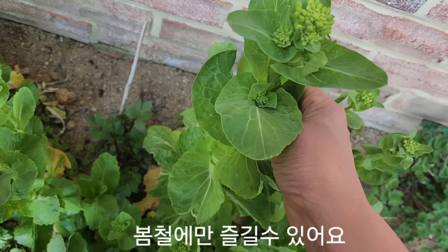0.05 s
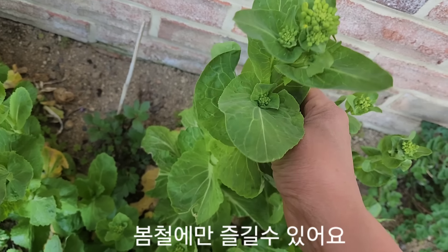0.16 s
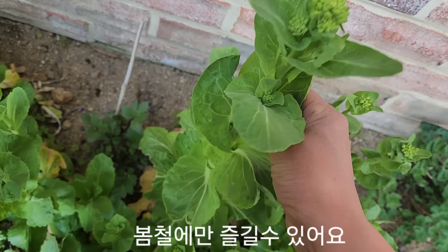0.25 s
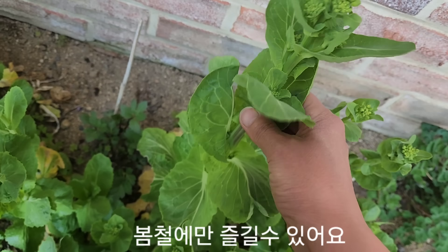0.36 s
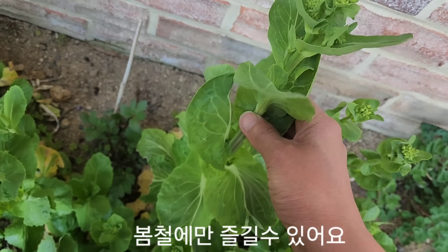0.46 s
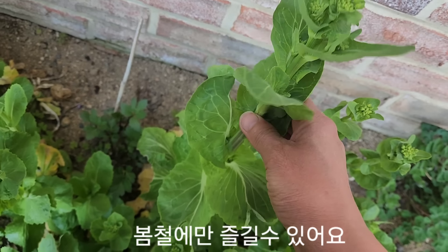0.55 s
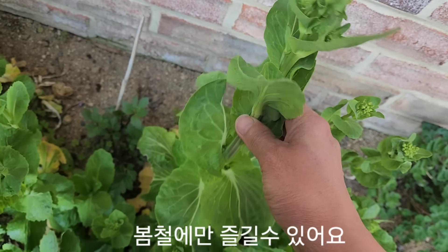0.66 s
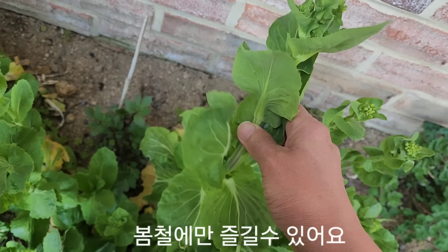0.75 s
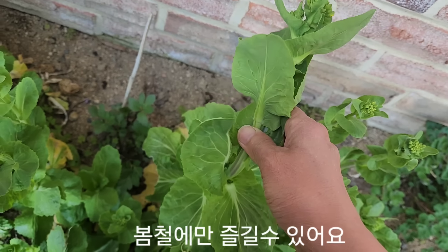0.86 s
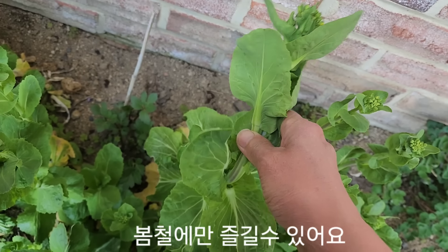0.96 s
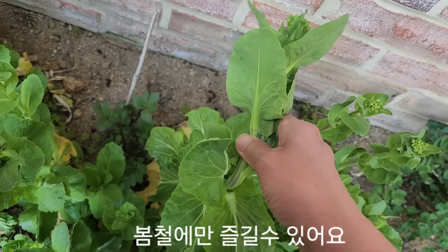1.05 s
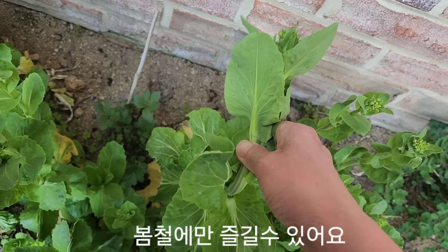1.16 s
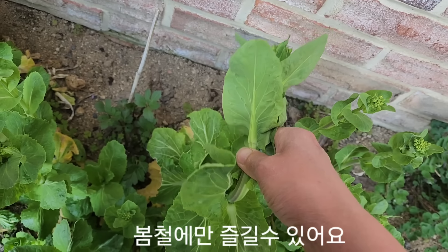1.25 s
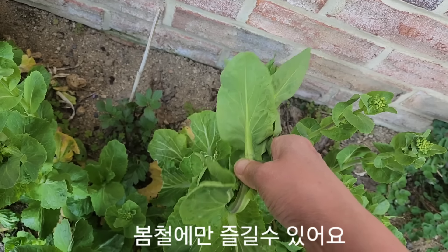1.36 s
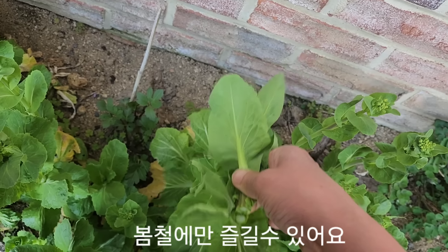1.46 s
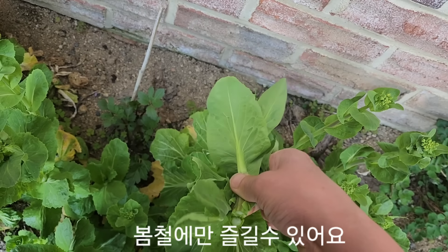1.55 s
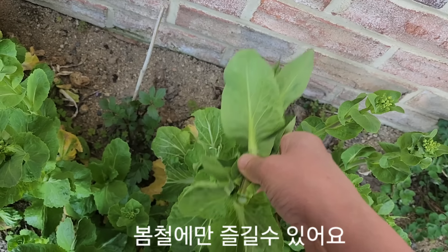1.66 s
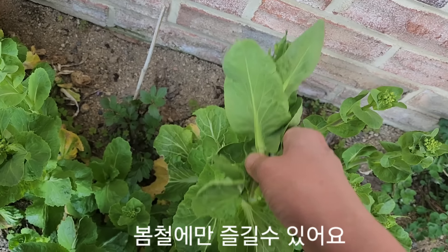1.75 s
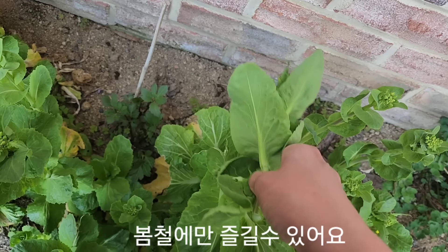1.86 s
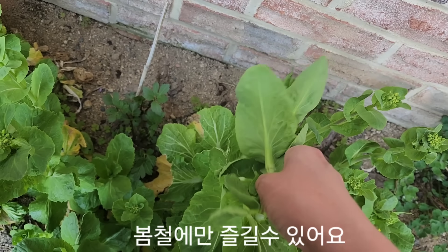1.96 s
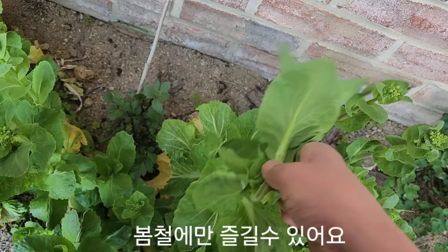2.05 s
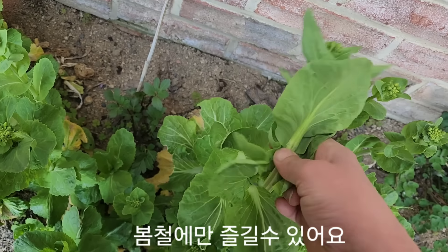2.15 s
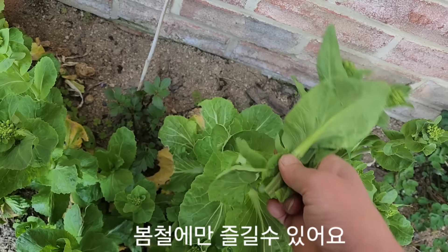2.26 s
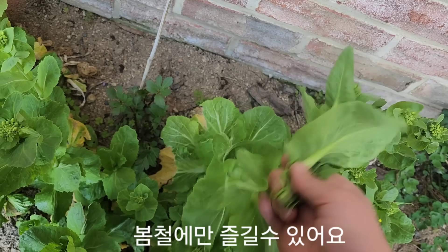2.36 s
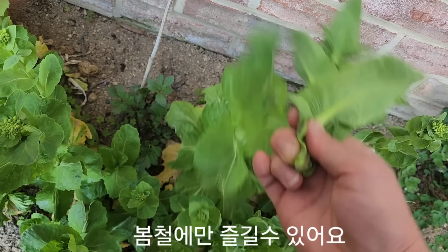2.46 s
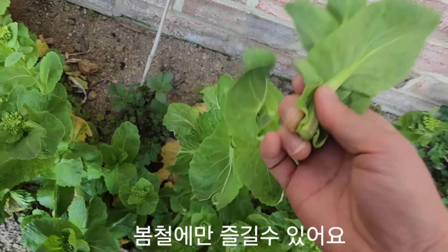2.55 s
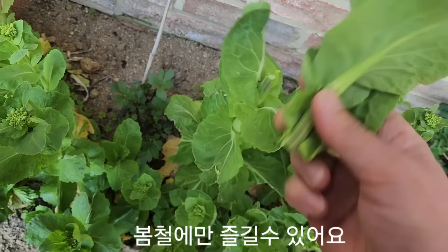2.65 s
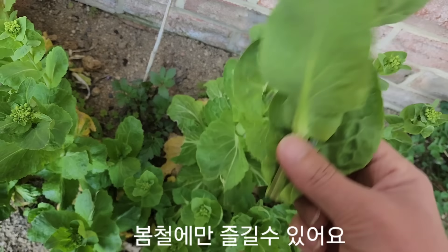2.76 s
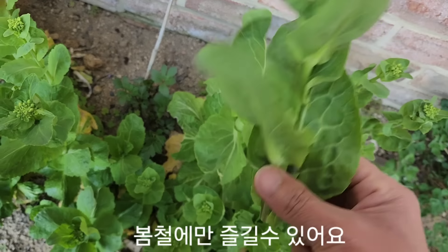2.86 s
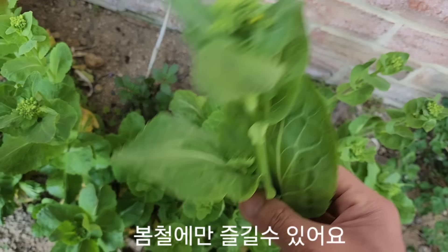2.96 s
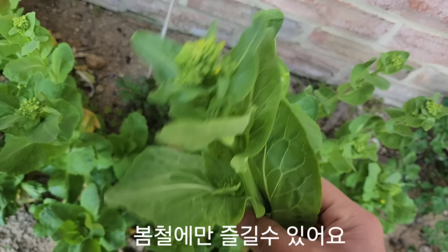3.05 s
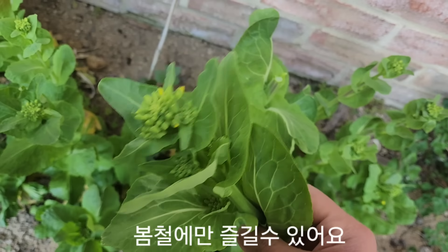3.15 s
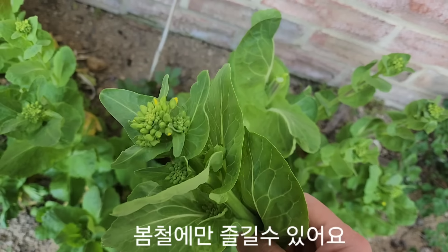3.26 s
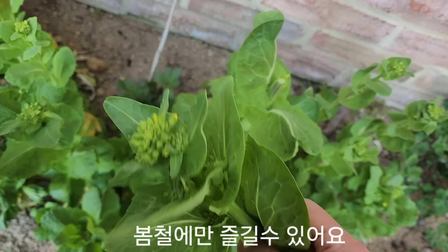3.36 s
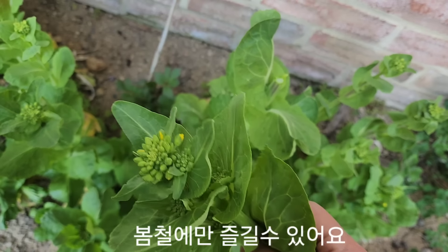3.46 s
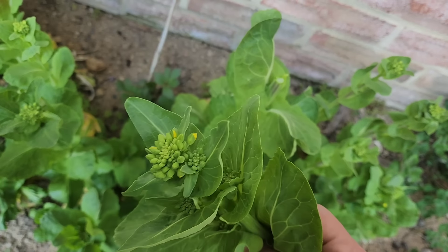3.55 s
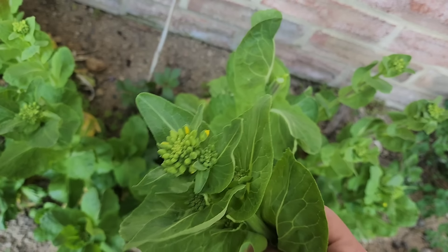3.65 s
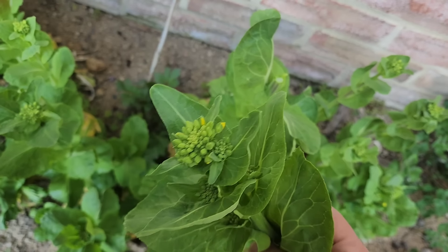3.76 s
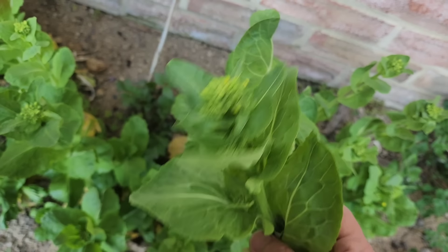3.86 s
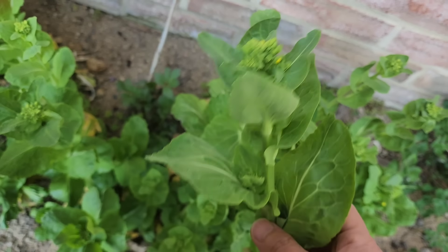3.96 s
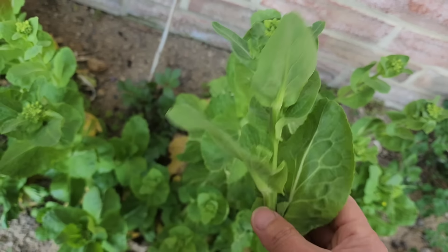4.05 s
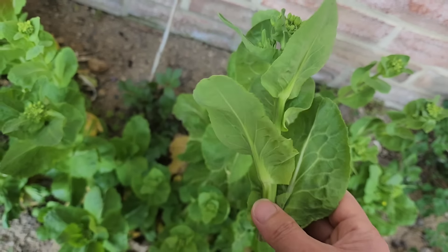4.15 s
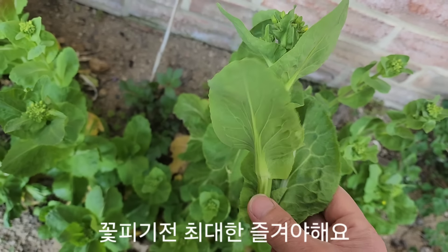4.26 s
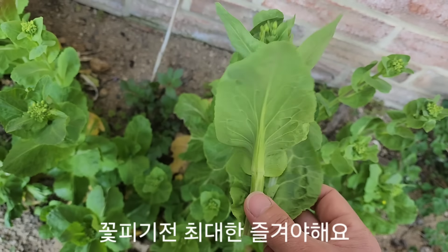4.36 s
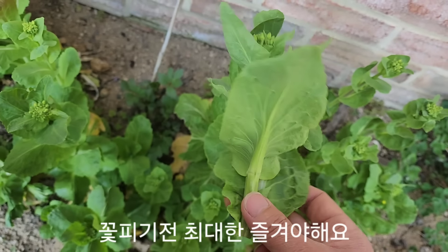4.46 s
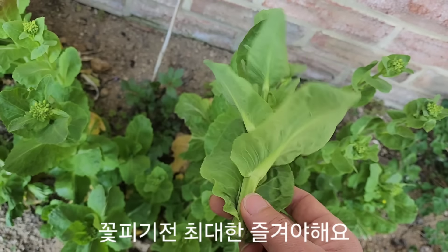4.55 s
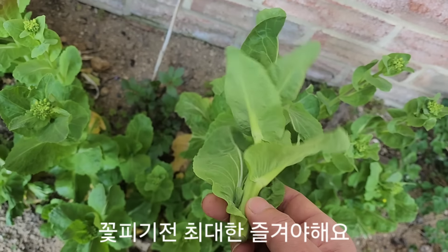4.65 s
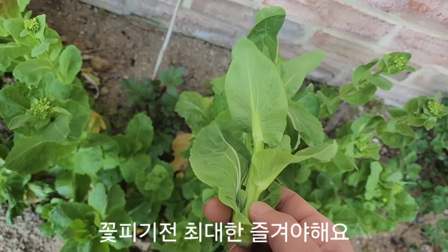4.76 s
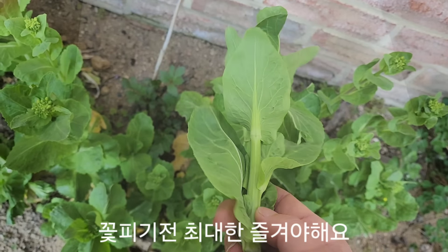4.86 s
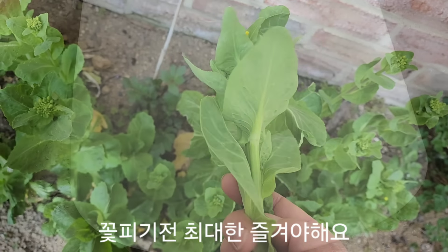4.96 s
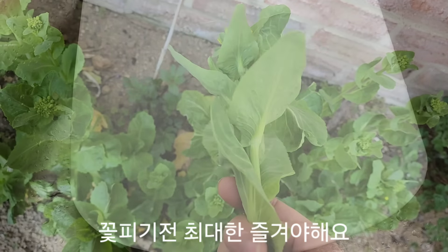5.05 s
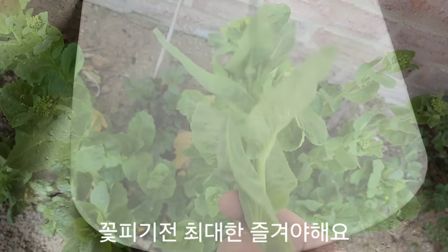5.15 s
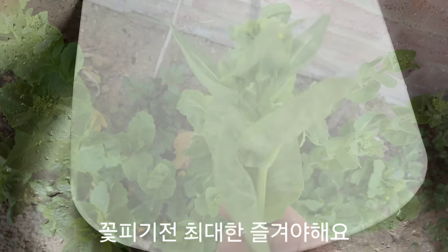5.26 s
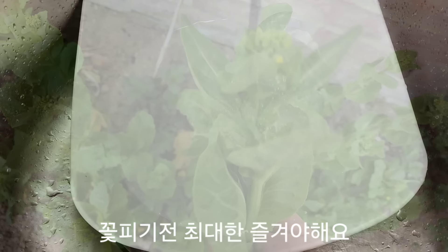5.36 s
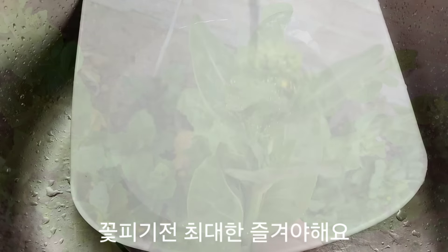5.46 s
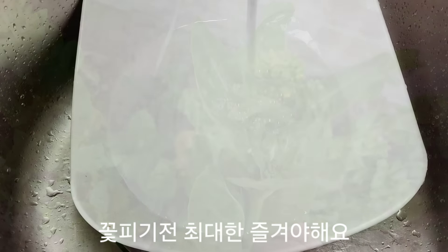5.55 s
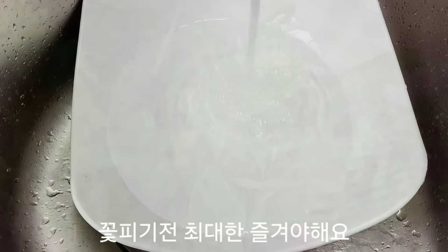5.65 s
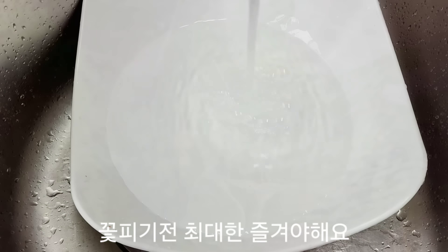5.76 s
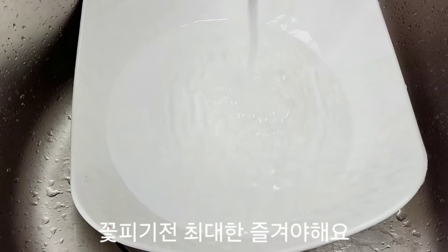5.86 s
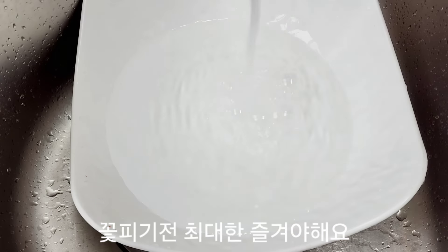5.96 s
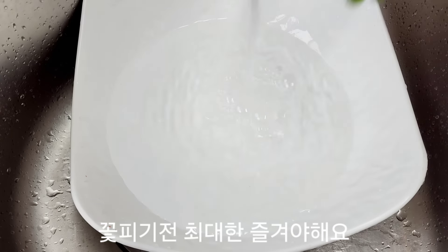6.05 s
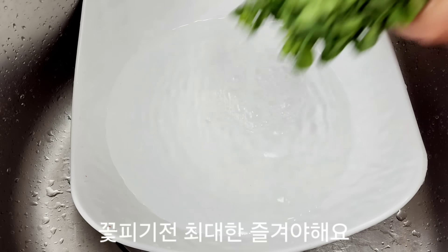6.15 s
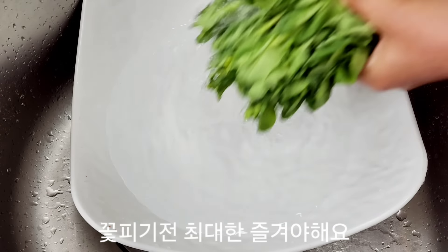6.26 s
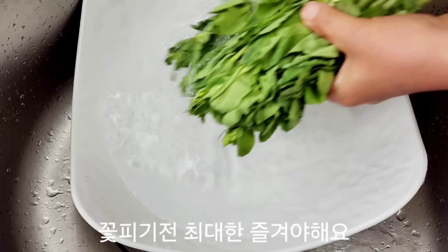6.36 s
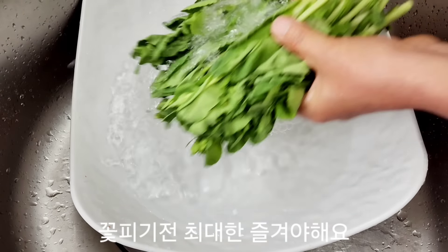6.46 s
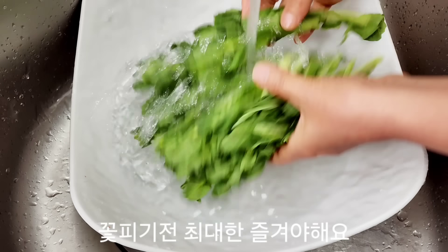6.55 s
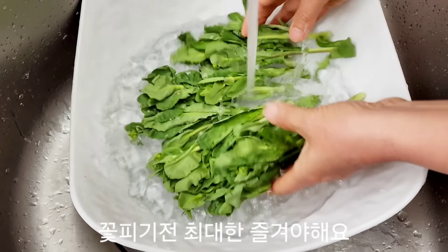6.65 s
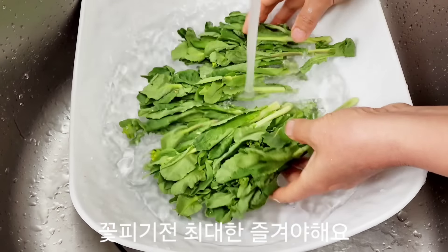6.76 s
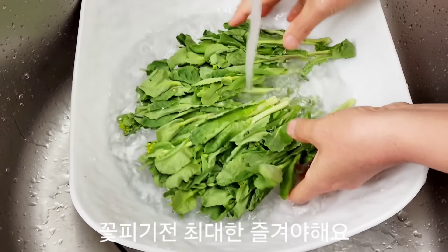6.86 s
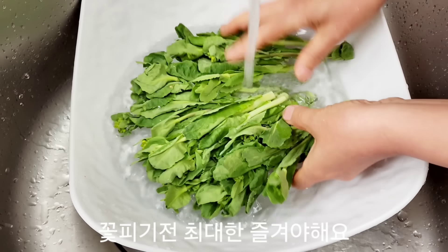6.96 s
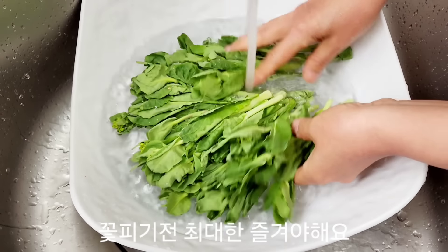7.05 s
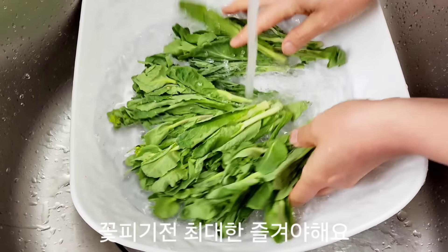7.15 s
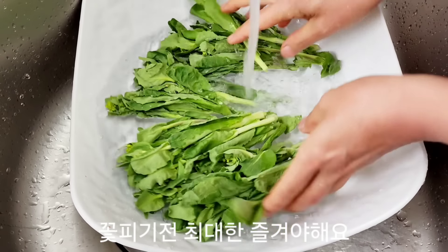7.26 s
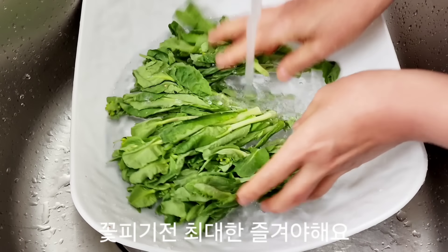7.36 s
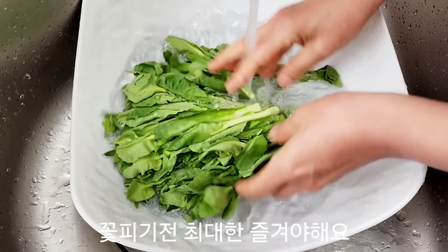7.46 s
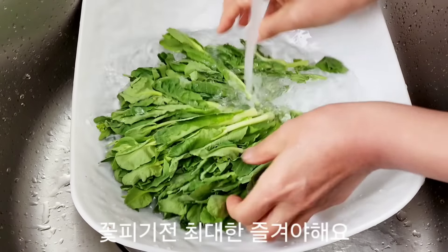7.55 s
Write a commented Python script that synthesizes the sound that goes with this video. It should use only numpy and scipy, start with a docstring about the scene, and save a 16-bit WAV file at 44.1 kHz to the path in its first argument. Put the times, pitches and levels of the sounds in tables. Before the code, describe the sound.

Close outdoor recording: a hand brushes through leafy plants with soft rustles and small ticks, over a faint low engine hum. Two crisp stalk snaps crack out, followed by small squeaky creaks. The garden fades into a kitchen sink where a tap drums into a shallow plastic basin, then a bunch of greens drops in and is swished, turning the water to splash and patter.

```python
"""A hand rustles through leafy greens in a garden and snaps off two crisp shoots, a far engine droning behind.
Leaves are coloured noise and tiny slips; stalks are cracks of noise over damped modes; the engine is a few sines.
The garden fades into a kitchen: a tap drums into a shallow plastic basin, then greens are swished under the stream.
The water is impulses through resonances, clouds of bubbles and spray noise; bumps on the basin are damped modes."""
import sys
import numpy as np
from scipy import signal
from scipy.fft import rfft, irfft, next_fast_len
from scipy.io import wavfile
from scipy.ndimage import uniform_filter1d, map_coordinates

SR = 44100
rng = np.random.default_rng(int(sys.argv[2]) if len(sys.argv) > 2 else 0)


def to_wav(sig):
    """Store sig (one row per channel, or 1-D mono) as 16-bit WAV at the path in sys.argv[1].

    Samples outside -1..1 are clipped; the rate is SR.
    """
    pcm = np.clip(np.atleast_2d(sig), -1, 1) * 32767
    pcm = np.round(pcm).astype(np.int16)
    wavfile.write(sys.argv[1], SR, pcm.T)  # frames by channels


N = 335601

# How alike left and right are in the open garden: f/Hz, likeness (0-1)
OUTDOORS = [(100, 0.94), (1000, 0.23), (3000, 0.2), (10000, 0.12)]
# How alike left and right are in the kitchen: f/Hz, likeness (0-1)
INDOORS = [(100, .98), (300, 0.98), (800, 0.36), (2000, 0.15), (5000, 0.0053), (12000, 0)]


def amp(db):
    """Decibels to gain."""
    return 10 ** (np.asarray(db) / 20)


def unit(x):
    """Scale to rms 1."""
    return x / np.sqrt(np.mean(x ** 2) + 1e-20)


def along(points, hz):
    """Read (Hz, value) points at any frequency, on a log axis."""
    f, v = np.transpose(points)
    return np.interp(np.log(hz + 1), np.log(f + 1), v)


def curves(rows):
    """One value per sample for each column after the time; -120 before the first row."""
    s, *cols = np.transpose(rows)
    return [np.interp(np.arange(N) / SR, s, c, left=-120) for c in cols]


def wobble(rate):
    """A smooth random curve, rate knots a second."""
    knots = rng.standard_normal(int(N * rate / SR) + 4)
    return map_coordinates(knots, [np.arange(N) * rate / SR])


def filtered(x, response):
    """Filter x by a response given as a function of frequency."""
    n = x.shape[-1]
    m = next_fast_len(n + 8192)
    return irfft(rfft(x, m) * response(np.fft.rfftfreq(m, 1 / SR)), m)[..., :n]


def resonances(modes, f):
    """Response of (Hz, width Hz, dB) resonances with alternating signs."""
    total = 0
    for k, (centre, width, db) in enumerate(modes):
        damping = 1j * f * width
        total = total + (-1) ** k * amp(db) * damping / (centre * centre - f * f + damping)
    return total


def add(track, s, sound):
    """Mix a sound into a track at time s."""
    part = track[..., round(s * SR):][..., :sound.shape[-1]]
    part += sound[..., :part.shape[-1]]


def stereo(pair, spectrum, alike):
    """Colour two unrelated signals and blend them into left and right, rms 1."""
    def mid_side_response(hz):
        turn = np.arccos(np.clip(along(alike, hz), -1, 1)) / 2
        return amp(along(spectrum, hz)) * [np.cos(turn), np.sin(turn)]

    mid, side = filtered(pair, mid_side_response)
    return unit(np.array([mid + side, mid - side]))


def noise(size=N):
    """Two unrelated white noises."""
    return rng.standard_normal((2, size))


def crackle(rate, spread_db):
    """Sparse impulses of very unequal size, about rate a second, rms 1."""
    present = rng.random(N) < rate / SR
    size = amp(spread_db * np.minimum(rng.exponential(size=N), 3))
    return unit(noise() * present * size)


def bubbles(count, pitch_hz, scatter, cycles, rise, spread_db):
    """A cloud of bubbles, each a dying sine that rises as it nears the surface."""
    t = np.arange(SR // 40) / SR
    hz = np.minimum(pitch_hz * np.exp(scatter * rng.standard_normal((count, 1))), SR / 3)
    age = t * hz / cycles
    size = amp(spread_db * np.minimum(rng.exponential(size=(count, 1)), 3))
    turns = hz * t * (1 + rise * np.minimum(age, 5) / 2)
    rings = size * np.exp(-age) * np.sin(2 * np.pi * turns)
    where = (rng.integers(0, N, (count, 1)) + np.arange(len(t))).ravel()
    sides = rng.uniform(0, 2 * np.pi, (count, 1))
    channels = [np.bincount(where, (rings * g).ravel(), N)[:N] for g in (np.cos(sides), np.sin(sides))]
    return unit(np.array(channels))


def ring(modes, t, wave=np.sin):
    """Damped (Hz, dB, t60 s) modes, struck at slightly new strengths each time."""
    return sum(amp(db + rng.normal(0, 1) - 60 * t / t60) * wave(2 * np.pi * hz * t) for hz, db, t60 in modes)


def patchy(x, depth_db):
    """The colour shifts from moment to moment in patches some 300 Hz wide and 25 ms long, rms 1."""
    z = signal.stft(x, nperseg=512)[2]
    field = rng.standard_normal(z.shape[1:])
    field = uniform_filter1d(uniform_filter1d(field, size=4, axis=0), size=4, axis=1)
    return unit(signal.istft(z * amp(depth_db * unit(field)), nperseg=512)[1][:, :N])


def gesture(start, length, attack, release):
    """Gain of one movement: full at its start after a rise, it holds, then falls 20 dB each release time."""
    t = np.arange(N) / SR - start
    return np.clip(1 + t / attack, 0, 1) ** 2 * amp(-20 * np.maximum(t - length, 0) / release)


def movements(rows, attack, release):
    """Joint gain of (start s, length s, dB) movements, whose powers add."""
    return np.sqrt(sum((amp(db) * gesture(s, length, attack, release)) ** 2 for s, length, db in rows))


def garden_air():
    """Open air as coloured noise, and a far engine whose close lines beat."""
    # Lines of the far engine: f/Hz, level/dB rms before the garden fade
    engine_lines = [(77.6, -64.5), (88, -69.5), (130, -82.5), (155.8, -66), (174.8, -79)]
    # Colour of the outdoor air: f/Hz, relative level/dB per Hz
    air_colour = [(20, -22.5), (35, 2.5), (62, 6), (85, 8.5), (110, 2), (135, 5.5), (210, -4.5), (300, -18),
                  (480, -21), (1000, -11), (2000, -24), (5000, -38), (10500, -40), (13000, -54.5)]
    t = np.arange(N) / SR
    drone = 0
    for hz, db in engine_lines:
        gain = amp(db + 0.35 * wobble(8.9)) * np.sqrt(2)  # rms to peak
        phase = 0.25 * wobble(3.3) + rng.uniform(0, 2 * np.pi)
        drone = drone + gain * np.sin(2 * np.pi * hz * t + phase)
    return drone + amp(-68) * stereo(noise(), air_colour, OUTDOORS)


def far_tone():
    """A faint far whine: one sine that swells and fades, unsteady in level and phase."""
    # Whine at the microphone: t/s, level/dB before wobble and garden fade
    whine_level = [(2.6, -87), (2.9, -89), (3.45, -84.5), (3.8, -105), (4.2, -130)]
    whine_hz = 570
    gain = amp(curves(whine_level)[0] + 2.2 * wobble(8.5))
    return gain * np.sin(2 * np.pi * whine_hz * np.arange(N) / SR + wobble(18))


def sink():
    """The steel sink rumbles under the running water, as low coloured noise."""
    # Hollow rumble of the sink: f/Hz, relative level/dB per Hz
    rumble_colour = [(20, -7), (42, -2), (58, -10), (80, -3), (105, 3.5), (150, -20), (220, -10),
                     (400, -18)]
    return amp(-53) * stereo(noise(), rumble_colour, INDOORS)


def kitchen_fade():
    """Gain of the running water and sink, which fade in evenly."""
    fade_start_s, fade_length_s = 4.983, 1.437
    return np.clip((np.arange(N) / SR - fade_start_s) / fade_length_s, 0, 1)


def knocks():
    """The bunch and the hands bump the basin, which thuds on the sink; both ring as damped modes."""
    # Bumps: t/s, basin wall level/dB before trim, sink level/dB
    bumps = [(6.3295, -32.5, -65), (6.347, -41, -75), (6.656, -51, -49), (6.681, -66, -46)]
    # Modes of the plastic wall: f/Hz, relative level/dB, t60/s
    wall_modes = [(270.4, 0, 0.28), (386, -29, .07), (635, -25, 0.1), (704, 8.5, 0.041), (920, -6, 0.099),
                  (1176, -2, 0.046), (1590, 3, 0.017), (1820, -2, 0.023)]
    # Modes of the steel sink: f/Hz, relative level/dB, t60/s
    steel_modes = [(42, -15, 0.2), (67.4, 2, 0.26), (106.5, -6.5, 0.72)]
    out, t = np.zeros(N), np.arange(SR // 3) / SR
    for s, wall_db, sink_db in bumps:
        wall = amp(wall_db - 10.5) * ring(wall_modes, t)
        steel = amp(sink_db) * ring(steel_modes, t)
        add(out, s, wall + steel)
    return out


def splashes():
    """Each blob slaps in a burst of spray; its bubble rings for a set number of cycles, jostled and rising in pitch."""
    # Blobs of water that trap a bubble: t/s, slap level/dB and bubble level/dB before trim, pitch f/Hz
    blobs = [(5.0728, -43, -65, 3570), (5.713, -34, -46.5, 3450), (5.8903, -33.5, -49, 2130),
             (6.202, -30.5, -43, 2210), (6.275, -33, -42, 2890), (6.345, -29.5, -49, 1065),
             (6.405, -33.5, -52, 576), (6.487, -44, -43.5, 1534), (6.51, -52, -40, 1655),
             (6.655, -26.5, -46, 1520), (6.6934, -34, -37.5, 2030), (6.857, -38, -36.5, 3780),
             (6.8852, -35, -40.5, 2560), (6.9547, -34, -43, 3210), (6.978, -47, -36, 3760),
             (7.019, -43, -42, 2600), (7.0374, -31, -33, 7260), (7.051, -34, -31, 4110),
             (7.141, -52, -38, 3140), (7.24, -34, -27.5, 5630)]
    life_cycles = 168  # to -60 dB
    phase_stretch_per_s = 0.88  # the pitch climbs twice as fast
    jostle_rad = 0.42  # rms, from the stream
    out, t = np.zeros((2, N)), np.arange(SR // 8) / SR
    for s, slap_db, bubble_db, hz in blobs:
        slap = stereo(noise(size=len(t)), [(400, -10), (hz, 0), (8000, -4), (16000, -13)], INDOORS)
        add(out, s, amp(slap_db - 13 - 60 * t / 0.094) * slap)
        life = amp(-60 * t * hz / life_cycles) * (1 - np.exp(-t / 0.00085))
        jostle = jostle_rad * unit(uniform_filter1d(noise(size=len(t)), size=90, axis=1))
        phases = rng.uniform(0, 4.3, (2, 1)) + jostle  # the sink walls blur its direction
        tone = np.sin(2 * np.pi * hz * t * (1 + phase_stretch_per_s * t) + phases)
        add(out, s, amp(bubble_db + 1) * life * tone)
    return out


def stream_gains(cover):
    """Gains of drumming, gurgle and spray: leaves damp the steady stream, surges and swishes add their power to it."""
    # The stream strikes the basin harder: full from t/s, length/s, level/dB
    surges = [(4.96, 0.098, -43), (5.205, 0.045, -51), (5.41, 0.058, -51), (5.55, 0.019, -58),
              (5.89, 0.089, -55), (6.08, 0.042, -60), (6.66, 0.14, -63.5), (6.93, 0.11, -58.5),
              (7.43, 0.032, -57)]
    # Greens are swished through the water: full from t/s, length/s, gurgle level/dB, spray over gurgle/dB
    swishes = [(6.465, 0.034, -53.5, 7.5), (6.674, 0.12, -50, 0.5), (6.828, 0.095, -48, 0),
               (6.951, .11, -49, 0.5), (7.126, 0.13, -50.5, 2), (7.285, 0.099, -59, 15),
               (7.406, .08, -51, -7), (7.53, 0.019, -53.5, 8)]
    attack_s, release_s = 0.048, 0.052  # water is pushed, then runs back
    drum_db, gurgle_db, spray_db = -52, -52, -52  # the steady stream in the bare basin
    cushion_db, calm_db, soften_db = -17, -4.5, -0.5  # change of each under full leaf cover
    surge_gurgle_db, surge_spray_db = -3, 1  # what a surge stirs up, over its drumming
    surge = movements(surges, attack_s, release_s)
    slosh = movements([(s, length, db) for s, length, db, _ in swishes], attack_s, release_s)
    spatter = movements([(s, length, db + more) for s, length, db, more in swishes], attack_s, release_s)
    drum = [amp(drum_db + cushion_db * cover), surge]
    gurgle = [amp(gurgle_db + calm_db * cover), amp(surge_gurgle_db) * surge, slosh]
    spray = [amp(spray_db + soften_db * cover), amp(surge_spray_db) * surge, spatter]
    return [np.linalg.norm(parts, axis=0) for parts in (drum, gurgle, spray)]


def struck(modes):
    """Falling water strikes resonant modes: impulses over a steady hiss, rms 1."""
    blows = crackle(rate=900, spread_db=3.0) + 0.29 * noise()
    return unit(filtered(blows, lambda f: resonances(modes, f)))


def tap():
    """The stream drums on the basin, gurgles in the pool or patters on the leaves, and breaks up into spray."""
    # Share of the stream that lands on leaves: t/s, share (0-1)
    leaf_cover = [(6.36, 0), (6.48, 0.94), (6.8, 1), (7.61, 0.74)]
    # Resonances of the basin: f/Hz, width/Hz, relative level/dB
    basin_modes = [(286.1, 15, -1), (415.3, 8.3, -3), (448, 37, -9.5), (656, 52, -8), (779, 34, -2.5),
                   (965, 77, -8)]
    # Resonances of the open water: f/Hz, width/Hz, relative level/dB
    pool_modes = [(1270, 130, 0), (1423, 30, 5), (1595, 87, 1.5), (2075, 130, -2), (2316, 73, 0.5),
                  (3900, 320, -21.5)]
    # Pockets among wet leaves and the basin wall: f/Hz, width/Hz, relative level/dB
    pocket_modes = [(2144, 33, 2.5), (2563, 60, -1), (3164, 34, -0.5), (3440, 81, -2), (3760, 97, -1),
                    (4197, 57, -0.5), (4740, 60, 1), (5170, 81, -7), (5400, 89, -5), (7290, 140, -41)]
    # Colour of the gurgle: f/Hz, relative level/dB per Hz
    gurgle_colour = [(500, -22), (1050, -9), (1500, -3), (2300, -2), (3000, 0.5), (3900, -1), (5000, -6.5),
                     (8000, 0), (11000, -31)]
    # Colour of the spray: f/Hz, relative level/dB per Hz
    spray_colour = [(2500, -12), (4200, -1.5), (5000, -2), (6200, -1.5), (7600, -0.5), (9500, -7),
                    (12000, -5), (15500, -6.5)]
    drum_colour = [(120, -8.0), (240, -1.0), (1100, -12.5), (2200, -9)]
    cover = np.clip(curves(leaf_cover)[0], 0, 1)
    drum_gain, gurgle_gain, spray_gain = stream_gains(cover)

    deep = bubbles(count=450, pitch_hz=698, scatter=0.304, cycles=6.2, rise=0.03, spread_db=5)
    bare = stereo(struck(basin_modes) + 0.32 * deep, drum_colour, INDOORS)
    # leaves soften the blows
    cushioned = unit(filtered(bare, lambda hz: amp(along([(420, 1), (700, -10)], hz))))
    drum = (1 - cover) * bare + cover * cushioned

    large = bubbles(count=3000, pitch_hz=2336, scatter=0.61, cycles=15, rise=0.042, spread_db=2.0)
    landing = np.sqrt(1 - cover) * struck(pool_modes) + np.sqrt(cover) * struck(pocket_modes)
    churn = crackle(rate=6300, spread_db=6.0)
    gurgle = stereo(landing + 0.5 * large + 1.9 * churn, gurgle_colour, INDOORS)

    small = bubbles(count=4000, pitch_hz=6710, scatter=0.39, cycles=13.5, rise=0.054, spread_db=7.5)
    droplets = 0.38 * small + 0.9 * crackle(rate=3500, spread_db=4.5) + 1.05 * noise()
    spray = stereo(patchy(droplets, depth_db=3.5), spray_colour, INDOORS)

    flutter = amp(0.78 * wobble(45))  # the stream wavers as it lands
    return flutter * (drum_gain * drum + gurgle_gain * gurgle + spray_gain * spray)


def bump():
    """One soft, low bump as the hand turns over: two damped modes with a soft onset."""
    out, t = np.zeros(N), np.arange(SR // 4) / SR
    thump = ring([(138, 0, 0.12), (197, -1.1, 0.076)], t) * (1 - np.exp(-t / 0.0025))
    add(out, 2.85, amp(-49) * thump)
    return out


def slips():
    """Yield the slips of every creak: gaps grow or shrink by a ratio; mid-run pressure makes it louder and higher."""
    # Runs of stick and slip on waxy stalks: start t/s, length/s, first gap/s, next gap over the last,
    # mid-run level/dB before trim, mid-run pitch f/Hz, upper ring/dB before offsets, leaf scrape/dB
    creaks = [(2.2473, 0.027, 0.0095, 0.95, -39, 3000, -17, -1.5),
              (2.304, .023, .0064, 1, -41.5, 4460, -12, 1),
              (3.543, 0.084, .0078, 1.33, -43.5, 3150, 1.5, 1),
              (4.003, .076, .01, 1.03, -43.5, 3500, 4.5, -9.5)]
    edge_db = -5  # at the ends of a run
    pitch_scatter, pitch_bend, jitter_s = 0.015, 0.065, 0.00035  # bend: log pitch sag at the ends
    for start, length, gap, stretch, db, hz, upper_db, scrape_db in creaks:
        ages = np.cumsum(np.append(0, gap * stretch ** np.arange(12)))
        for age, (late, sharp) in zip(ages[ages < length], rng.standard_normal((len(ages), 2))):
            slack = (2 * age / length - 1) ** 2  # 0 mid-run, 1 at the ends
            pitch = hz * np.exp(pitch_scatter * sharp - pitch_bend * slack)
            yield start + age + jitter_s * late, db + edge_db * slack, pitch, upper_db, scrape_db


def squeaks():
    """Stalks rub softly, then stick and slip; every slip rings a low pitch and a cluster of higher ones."""
    # Stalk rubbing on stalk: t/s, level/dB before the garden fade
    rub_level = [(3.88, -105), (3.94, -71), (3.97, -78.5), (4.02, -71), (4.07, -78), (4.1, -105)]
    # Resonances of the rub: f/Hz, width/Hz, relative level/dB
    rub_modes = [(3160, 220, -0.5), (5560, 820, -5.5), (7486, 900, -9)]
    # Colour of the leaf scrape: f/Hz, relative level/dB per Hz
    scrape_colour = [(600, -23), (1400, -5.5), (2300, -8), (4100, 5.5), (6500, -6), (10000, -6),
                     (14000, -14)]
    rubbing = unit(filtered(noise(), lambda f: resonances(rub_modes, f) * (f < 9000)))
    out, t = amp(curves(rub_level)[0]) * rubbing, np.arange(SR // 20) / SR
    for s, db, hz, upper_db, scrape_db in slips():
        upper = [(5500, upper_db - 7, 0.0045), (6300, upper_db + 2, 0.0045), (7300, upper_db + 1, 0.0045)]
        stalk = ring([(hz, 0, 0.009)] + upper, t) * (1 - np.exp(-t / 0.00026))
        shiver = amp(-60 * t / 0.0081) + amp(-12 - 60 * t / 0.06)  # the leaf on the stalk trembles on
        scrape = amp(scrape_db) * shiver * stereo(noise(size=len(t)), scrape_colour, OUTDOORS)
        add(out, s, amp(db - 6.5) * (stalk + scrape))
    return out


def ticks():
    """A leaf flicks free: a sharp click, a short ring at its own pitch, and a shiver of the blade."""
    # Leaves flicking free: t/s, level/dB before trim, pitch f/Hz, treble/dB at 10 kHz relative to the pitch
    flicks = [(0.4448, -47, 3020, -35), (0.7992, -37.5, 2670, -12), (0.951, -46, 3800, -9),
              (0.9768, -42.5, 4470, -5), (1.264, -40, 2880, -15), (1.4571, -36, 2550, -18),
              (1.5192, -41.5, 2105, -12), (1.6123, -38.5, 2500, -15), (1.699, -42, 4630, 2),
              (1.8225, -41.5, 2720, -7), (1.975, -43, 2000, -10), (2.009, -42.5, 2180, -13),
              (2.0215, -36, 1900, 0), (2.062, -41.5, 4950, 8), (2.2895, -48, 2980, -4),
              (2.4485, -37, 1690, 1), (2.5648, -35.5, 2600, -4), (2.936, -55, 5430, -7),
              (3.0686, -45.5, 1750, 11), (3.2235, -44, 5440, -19), (3.528, -51.5, 3055, -10),
              (3.971, -55.5, 5600, -4.5), (4.43, -51.5, 3520, -7.5), (4.788, -44.5, 3680, -7),
              (4.815, -40.5, 6600, 7)]
    out, t = np.zeros((2, N)), np.arange(SR // 25) / SR
    for s, db, hz, treble_db in flicks:
        colour = [(300, -23), (hz * 0.51, -14), (hz, 0), (hz * 1.3, -4)]
        colour += [(10000, treble_db), (16000, treble_db - 14.5)]
        decay = amp(-60 * t / 0.01) + amp(-13 - 60 * t / 0.052)  # click, then shiver
        click = stereo(noise(size=len(t)), colour, OUTDOORS) * decay
        blade = amp(-2.5) * ring([(hz, 0, 0.011)], t)
        add(out, s, amp(db - 7.5) * (click + blade))
    return out


def leaf_grains():
    """Clumps of tiny slips over a hiss, each spot with its own colour."""
    clumps = amp(2.5 * wobble(130))
    return patchy(clumps * (crackle(rate=900, spread_db=2.0) + 0.72 * noise()), depth_db=3.5)


def leaves():
    """Leaves slide over each other as the hand brushes through: clumped slips in a high hiss and a lower crinkle."""
    # Strokes of the hand: full from t/s, length/s, rustle level/dB before trim, crinkle over rustle/dB
    strokes = [(0.0, 0.081, -78.5, -5), (0.122, 0.016, -68, -3), (0.273, 0.058, -80, -15),
               (0.385, .11, -73, -2), (.535, 0.09, -65.5, -1), (0.665, 0.023, -58.5, -11),
               (0.791, 0.029, -65, 3.5), (0.825, 0.089, -68.5, -3), (0.948, 0.037, -62, 0),
               (0.99, 0.073, -71.5, 1.5), (1.103, 0.028, -62.5, 0.5), (1.163, 0.13, -66.5, -2),
               (1.341, 0.033, -64.5, -0.5), (1.445, 0.081, -62.5, 2.5), (1.541, 0.07, -62.5, 4),
               (1.644, 0.17, -70, -5.5), (1.801, 0.04, -64, 2), (1.919, 0.16, -70, 2.5),
               (2.123, 0.084, -66.5, -0.5), (2.263, 0.063, -62.5, 1.5), (2.41, 0.1, -68, -5),
               (2.535, 0.07, -58.5, 1), (2.674, 0.036, -67, 2), (2.744, 0.1, -69, -0.5),
               (2.86, .09, -75.5, -0.5), (3.018, 0.062, -79.5, 2), (3.225, .015, -72, 3),
               (4.424, 0.048, -75.5, 3), (4.693, 0.15, -70, -3), (4.898, 0.076, -62, -11.5)]
    # Faint stir of the held bunch: t/s, level/dB before trim
    held_stir = [(0, -86), (2.8, -76), (3.4, -92.5), (4.3, -90), (5.0, -78)]
    # Colour of the leaf hiss: f/Hz, relative level/dB per Hz
    hiss_colour = [(2500, -23.5), (4000, -7), (5500, -2), (7500, -4), (10000, 1.5), (12500, -13.5),
                   (16000, -16)]
    # Colour of the leaf body: f/Hz, relative level/dB per Hz
    body_colour = [(300, -44.5), (1000, -8.5), (1800, -3.5), (2900, -1), (4500, -3.5), (7000, -23.5)]
    attack_s, release_s = 0.041, 0.032  # leaves bend, then settle
    stir = amp(curves(held_stir)[0])
    rustle = movements([(s, length, db) for s, length, db, _ in strokes], attack_s, release_s)
    crinkle = movements([(s, length, db + more) for s, length, db, more in strokes], attack_s, release_s)
    hiss = amp(0.5) * np.hypot(rustle, stir) * stereo(leaf_grains(), hiss_colour, OUTDOORS)
    body = amp(-1.05) * np.hypot(crinkle, stir) * stereo(leaf_grains(), body_colour, OUTDOORS)
    return hiss + body


def snaps():
    """A turgid stalk cracks, rings and jolts the hand; fibres tear on and the wall and ground answer."""
    # Breaks of a stalk: t/s, level/dB before trims, crack/dB and thud of the hand/dB before trims
    breaks = [(1.5408, -4.5, 2.5, 3.5), (2.5092, -19, 3, 9), (2.5130, -11.5, -3.5, 8.5),
              (2.5472, -23, 1, 9)]
    # Modes of the stalk and the hand round it: f/Hz, relative level/dB, t60/s
    stalk_modes = [(778, -26, 0.0082), (1034, -1, 0.0097), (1212, -15.5, 0.024), (1665, 0, .012),
                   (2446, 4.5, 0.0039), (3380, -8, .007), (4320, -2, .005), (7100, -7.5, 0.00519),
                   (10900, -13.5, 0.0095)]
    # Modes of the jolted hand: f/Hz, relative level/dB, t60/s
    thud_modes = [(289, -8.5, 0.04), (376, 1, 0.021)]
    # Colour of the tail: f/Hz, relative level/dB per Hz
    tail_colour = [(150, -8), (300, 7.5), (500, -6), (850, 2), (2800, 1), (5000, -4.5), (10000, -6),
                   (16000, -13.5)]
    crack_colour = [(500, -16), (1200, -16), (8000, 13.5), (16000, 3)]
    out, t = np.zeros((2, N)), np.arange(SR // 5) / SR
    for s, db, crack_db, thud_db in breaks:
        let_go = 1 - np.exp(-t / 0.0002)
        stalk = amp(-11) * ring(stalk_modes, t, np.cos) * let_go  # cosine: released at full bend
        thud = amp(thud_db - 29.5) * ring(thud_modes, t, np.cos)
        crack = amp(crack_db - 17 - 60 * t / 0.0065) * stereo(noise(size=len(t)), crack_colour, OUTDOORS)
        tail = amp(-28 - 60 * t / 0.1) * stereo(noise(size=len(t)), tail_colour, OUTDOORS)
        add(out, s, amp(db) * (stalk + thud + crack + tail))
    thin = signal.butter(2, 170, "high", fs=SR, output="sos")  # so small a body radiates little bass
    return signal.sosfilt(thin, out) * amp([[1.6], [-1.6]])  # left of the microphone


def scene():
    """The garden gives way to the kitchen."""
    # How much of the garden is heard: t/s, gain/dB
    garden_fade = [(0, 2), (4.85, 1), (5.25, -3), (5.55, -5), (5.8, -5), (6, -80)]
    # Lean of the leaves towards the left: f/Hz, left minus right/dB
    leaf_lean = [(200, 1), (1000, 5.5), (2500, 8.5), (4400, 7.5), (8000, 1), (15000, 3)]
    half_each_side = np.array([[0.5], [-0.5]])
    foliage = filtered(leaves() + ticks(), lambda hz: amp(along(leaf_lean, hz) * half_each_side))
    garden = garden_air() + far_tone() + foliage + squeaks() + snaps() + bump()
    water = kitchen_fade() * (tap() + sink())
    return amp(curves(garden_fade)[0]) * garden + water + splashes() + knocks()


def record(dry):
    """The recorder cuts steeply above its band limit."""
    top_hz = 15600
    return filtered(dry, lambda hz: 1 / np.sqrt(1 + (hz / top_hz) ** 120))


dry = scene()
out = record(dry)
to_wav(out)
```